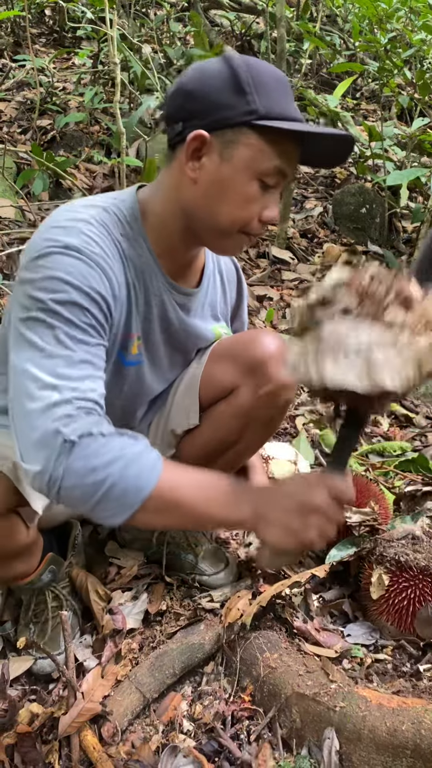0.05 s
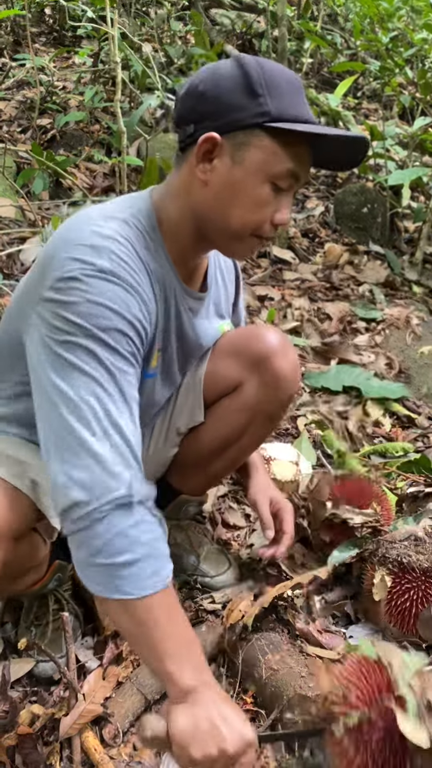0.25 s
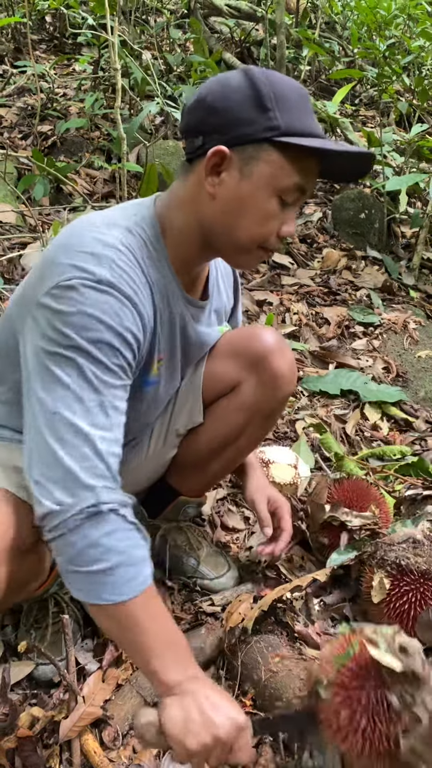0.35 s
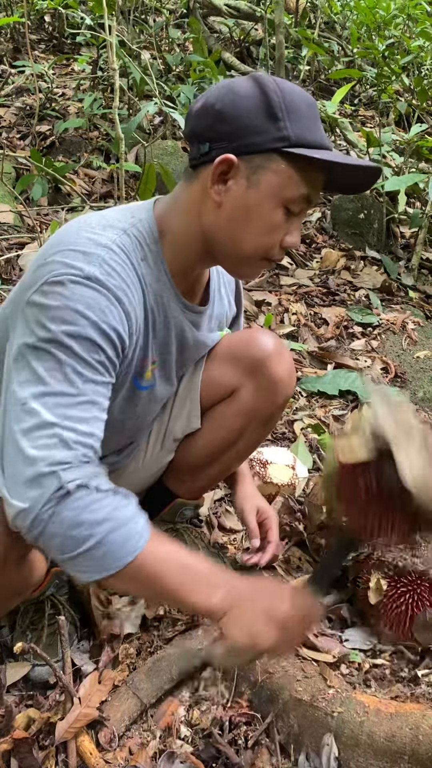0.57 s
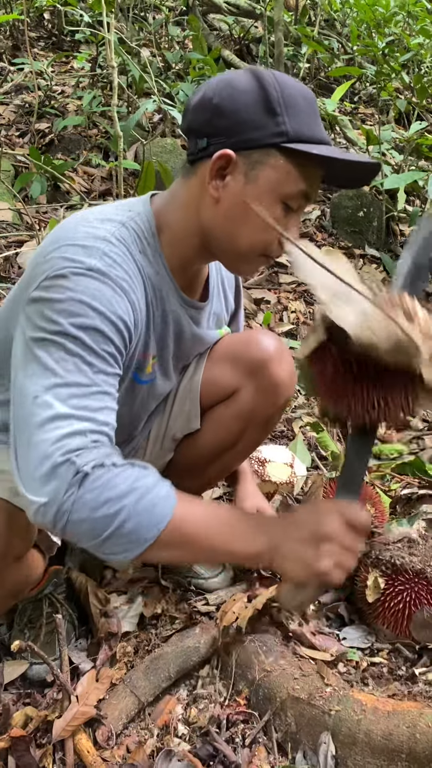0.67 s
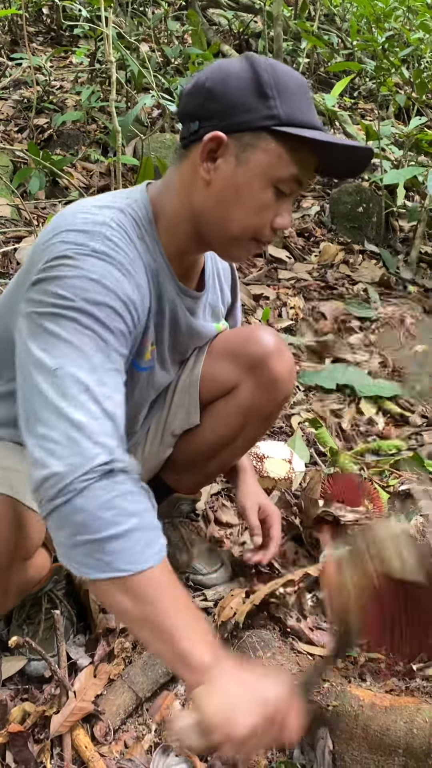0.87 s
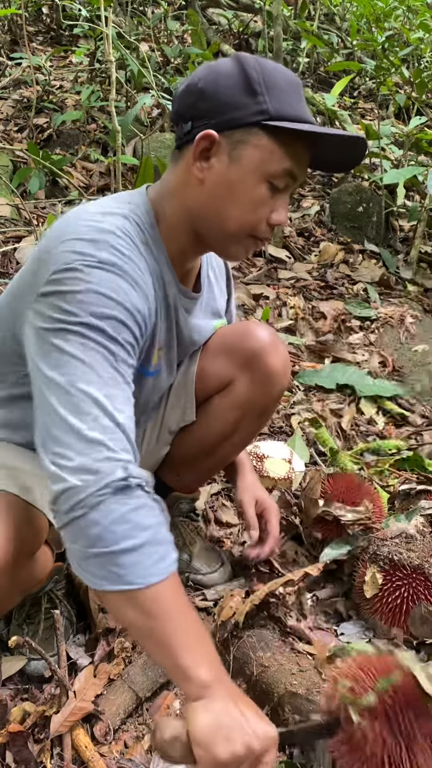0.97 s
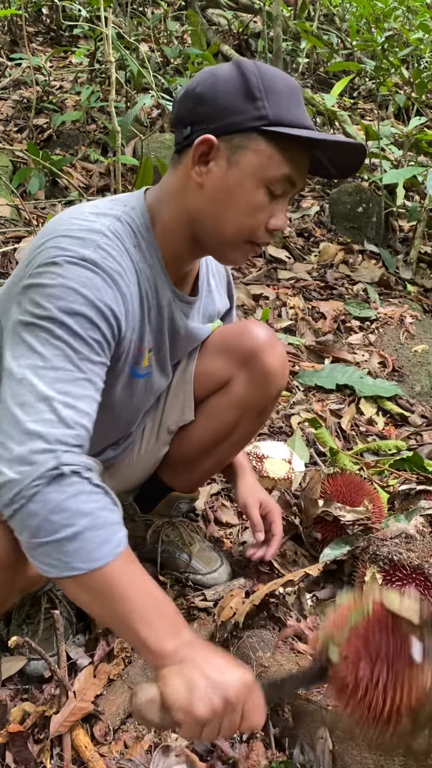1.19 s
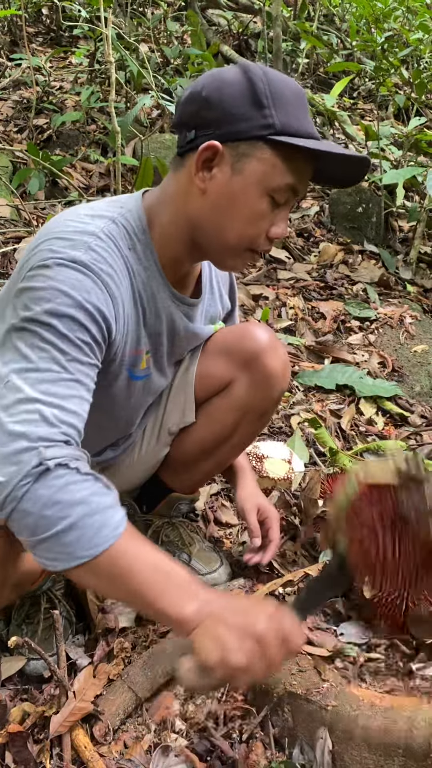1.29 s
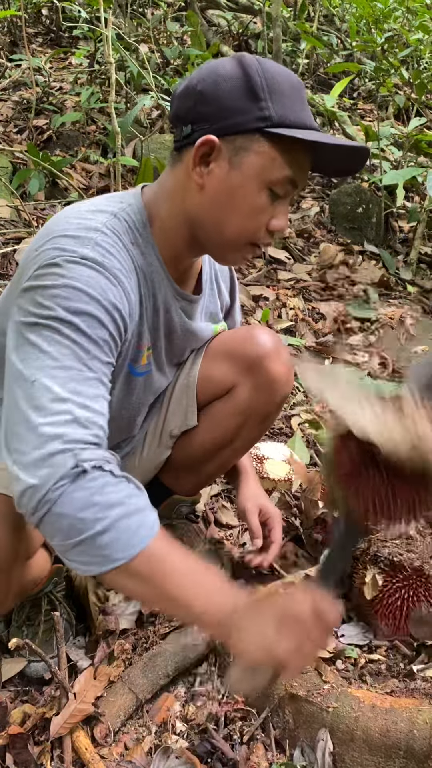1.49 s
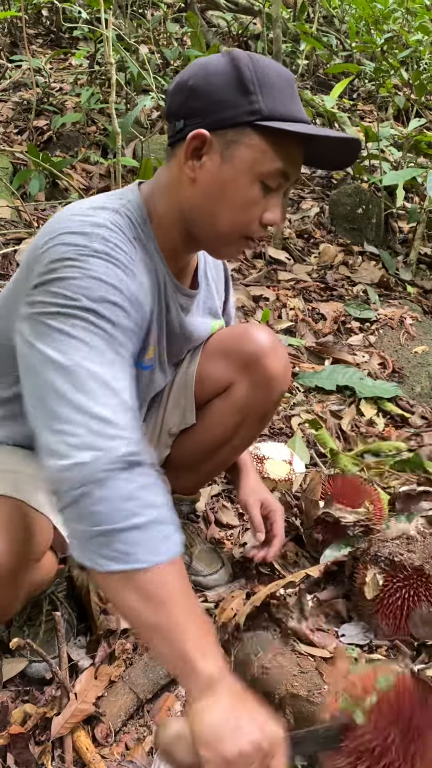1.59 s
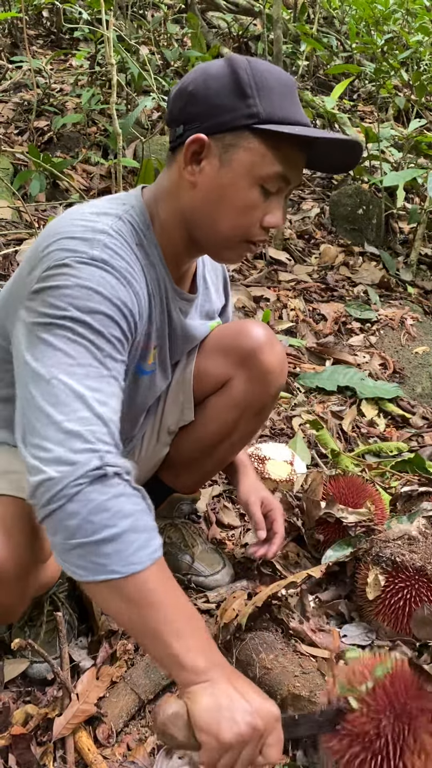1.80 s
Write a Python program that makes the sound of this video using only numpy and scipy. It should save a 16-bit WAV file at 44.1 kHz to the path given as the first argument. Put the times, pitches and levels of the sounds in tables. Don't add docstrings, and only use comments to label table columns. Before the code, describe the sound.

A spiky fruit stuck on a heavy blade is slammed three times onto a root outdoors

```python
import sys
import numpy as np
from scipy import signal
from scipy.fft import rfft, irfft
from scipy.io import wavfile
from scipy.ndimage import uniform_filter1d

SR = 44100
rng = np.random.default_rng(int(sys.argv[2]) if len(sys.argv) > 2 else 0)


def store_wav(level_fs):
    pcm = np.round(np.clip(np.atleast_2d(level_fs), -1, 1) * 32767)
    wavfile.write(sys.argv[1], SR, pcm.T.astype(np.int16))


def ratio(d):
    e = np.asarray(d, float) / 20
    return 10 ** e


N = 81585

# (frequency [Hz], level [dB])
FOREST_SPECTRUM = [(200, -9), (600, -6), (1200, -9), (3000, -6.5), (5000, -9), (7800, -1.5), (9500, -10.5),
                   (13500, -11.5)]
# (time [s], level [dB])
WIND_SWELL = [(0, -8), (.13, -3.5), (0.301, 3), (.55, -2.5), (.7, -6.5), (.84, -8), (1.1, 0), (1.28, -1),
              (1.36, 3), (1.55, -1), (1.85, -2)]
# (centre [Hz], width [Hz], level [dB], throb depth [dB], throb rate [1/s])
INSECT_CHORUSES = [
    (5800, 86, -68, 0, 4.9),
    (4050, 400, -74, 3, 11),
    (13500, 680, -76, 2.5, 14),
]
# (start [s], length [s], pitch [Hz], level [dB])
BIRD_NOTES = [(0.024, 0.052, 4050, -56), (0.668, 0.047, 4070, -55.5), (0.693, 0.066, 3166, -60),
              (0.055, 0.032, 3180, -62), (1.254, 0.074, 4075, -59), (1.302, 0.06, 3100, -62),
              (1.796, 0.042, 5070, -59)]
# (start [s], length [s], wingbeat [Hz], level [dB], second partial [dB])
FLY_PASSES = [
    (0.423, 0.1, 278, -69.5, 2),
    (1.274, 0.097, 291.3, -68.5, -4),
    (1.304, 0.57, 288.5, -76, 6),
]
# (start [s], length [s])
RUSTLE_TIMES = [(.935, .065), (1.002, .03), (1.15, .08), (1.63, .055), (1.71, .045), (1.275, .03), (.3, .2),
                (.245, .1), (1.02, .045)]
# (level [dB], centre [Hz])
RUSTLE_TONES = [(-42.5, 4200), (-46.5, 7000), (-55.5, 3470), (-45.5, 4900), (-57.5, 2600), (-57, 9000),
                (-60.5, 1900), (-51.5, 2800), (-47.5, 3900)]
# (time [s], peak [dB], pitch [Hz], T60 [s])
TWIG_TICKS = [(0.168, -48.5, 5460, 0.049), (0.345, -52, 3200, 0.024), (0.364, -45, 4800, 0.022),
              (0.3778, -37.5, 4470, 0.006), (0.444, -46, 3700, 0.02), (0.688, -49.5, 3880, 0.013),
              (0.714, -55, 2980, 0.039), (0.989, -36.5, 4180, 0.012), (1.008, -43.5, 3150, 0.024),
              (1.163, -53.5, 1650, 0.026), (1.179, -44.5, 1160, 0.018), (1.208, -50, 2110, 0.018),
              (1.642, -34, 5040, 0.016), (1.648, -24.5, 4970, 0.01), (1.6563, -22.5, 4950, 0.021),
              (1.731, -45.5, 5660, 0.027), (1.74, -42.5, 5020, 0.015), (0.966, -38, 6150, .012),
              (.972, -39, 5640, .012), (0.984, -45, 1590, .012), (1.014, -46, 4600, .012),
              (1.022, -45.5, 3340, .012), (1.026, -45, 4300, 0.011), (1.034, -39, 3890, 0.016),
              (1.041, -37, 3950, 0.011), (1.054, -43, 1700, 0.015), (1.059, -37.5, 4450, 0.011),
              (1.181, -46.5, 1600, 0.018), (.688, -51.5, 2250, 0.013), (.716, -55, 2006, 0.017),
              (1.568, -46, 5240, 0.011)]
# (time [s], peak [dB], pitch [Hz], T60 [s],
# breadth [share of pitch])
HUSK_REBOUNDS = [(0.2634, -20, 950, 0.025, 0.4), (.2633, -19, 3680, 0.012, 0.3),
                 (.2636, -23, 1750, .018, .4), (0.2855, -35, 1500, 0.015, 1.2),
                 (0.315, -42, 1200, 0.018, .8), (0.9369, -23, 1855, 0.018, 0.45),
                 (0.9373, -17, 5740, 0.025, 0.82), (.965, -38.5, 530, 0.034, 0.31),
                 (.9375, -30, 900, .03, .7), (1.040, -44, 975, 0.02, 0.35), (1.0545, -33, 1300, 0.03, 2.6),
                 (.962, -33, 4500, .02, 1.2), (1.5758, -13.5, 5900, 0.012, 0.5),
                 (1.577, -36, 11000, 0.028, 0.5), (1.6203, -22, 2200, 0.03, 1.1),
                 (1.6225, -27, 800, .03, .8), (1.7015, -33, 1480, 0.037, 1.8),
                 (1.5865, -7, 4930, 0.014, 0.36), (.9036, -12.5, 3800, 0.027, 0.39),
                 (1.7098, -38, 6000, .006, 1.2), (.8722, -47, 2500, .01, 1.2),
                 (1.287, -55.5, 11000, .02, 0.69), (1.166, -42, 16000, .02, 1.1),
                 (.2255, -15, 5600, .014, .4), (.8945, -36, 2700, .012, .5), (1.5762, -33, 1500, .02, 1.6),
                 (1.0025, -44, 1400, .011, 1.3), (1.0105, -44, 950, .011, .9),
                 (.4452, -51, 1300, .014, 2.1), (.5875, -55, 1300, .011, 1.7)]
# (contact [s], soil delay [s], crack [dB], spine crush before contact [dB], leaf crackle [dB])
BLOW_EVENTS = [
    (0.2251, 0.0071, -12.5, -25, -24.5),
    (0.903, 0.0034, -10, -28, -26),
    (1.5851, 0.00066, -16.5, -28.5, -26.5),
]
# (frequency [Hz], level [dB], T60 [s])
HUSK_MODES = [
    [(178.5, -5.5, 0.06), (274.4, -9.5, 0.069), (322, 3, 0.031), (565, 1.5, 0.018), (649, 3, 0.035),
     (898, 0, 0.03), (1230, 1, 0.025), (1475, -10, .03), (1639, 3.5, 0.014), (2078, 4.5, .018)],
    [(143, -7.5, 0.079), (259.3, 0.5, 0.075), (337.5, -1, 0.044), (507, -4.5, 0.041), (669, -5, 0.036),
     (850, -1.5, 0.047), (1024, -4.5, 0.055), (1320, -5, 0.03), (1412, -0.5, 0.059), (1914, -13, 0.033),
     (2150, 1, 0.02), (2440, 5, 0.027)],
    [(166, -12.5, 0.085), (262.6, -8, 0.087), (346.4, -2, 0.11), (529, 4, 0.053), (738, 1, 0.022),
     (853, 7, 0.014), (1090, 6, 0.01), (1490, -8.5, 0.022), (1910, -15, 0.03), (2380, -11, .02)],
]
# (frequency [Hz], level [dB], T60 [s])
SOIL_MODES = [
    [(60.8, -38, 0.35), (85, -44.5, 0.17)],
    [(47, -35, 0.26), (84, -37, 0.42)],
    [(47.8, -31.5, 0.26), (77.8, -42, 0.4)],
]
# (delay [s], share of first jolt [1])
SEATING_JOLTS = [
    [(.0035, 1.09), (.0072, .7)],
    [(.0028, 0.47), (.0068, 0.374)],
    [(.0012, .9), (.0075, 0.385)],
]
# (frequency [Hz], level [dB])
CRACK_SPECTRUM = [(600, -10.5), (1500, -4), (5000, -12.5), (7000, -9.5), (9000, 0), (11500, -3.5),
                  (13500, -4), (16500, -34.5)]
# (frequency [Hz], level [dB])
LEAF_SPECTRUM = [(150, -7), (400, 10.5), (1500, -12.5), (4000, -1.5), (7000, -5.5), (9000, -28),
                 (12000, -57.5), (16000, -66.5)]
# (frequency [Hz], phase [rad])
PORT_PHASE_RAD = [(150, 0), (500, 1.2), (1000, .4), (2000, .4), (2900, -1.7), (6000, -1.9), (8200, -np.pi),
                  (12300, -np.pi), (16000, -5.4)]
# (frequency [Hz], phase [rad])
LOW_PHASE_RAD = [(500, 0.1), (1000, -6), (2000, 0.34), (2900, -1.64), (6000, -1.24), (9000, -3),
                 (12000, -3), (16000, -5)]
# (frequency [Hz], level [dB])
PORT_LEVEL_DB = [(300, 1), (500, -5), (900, -1.5), (1400, -7.5), (2000, 3.5), (3500, -6), (6000, 1),
                 (16000, 1.5)]
# (frequency [Hz], share [0-1])
FAR_ALIKE = [(100, 0.61), (400, 0.15), (1500, 0.067), (4000, 0.25), (6000, 0.55), (8200, 0.99),
             (16000, 0.99)]

FOREST_DB, FOREST_TOP_HZ, WIND_TOP_HZ = -55, 13900, 1100
BREEZE_HZ, BREEZE_WIDTH_HZ, BREEZE_DB, BREEZE_GUST_DB = 59.9, 98, -81.5, 5
WOODS_T60_S, WOODS_DB = 0.74, -38.5
RUSTLE_GRAINS_PER_S, RUSTLE_SPREAD_DB = 3000, 2.2
CRACKLE_T60_S, CRACKLE_PER_S, CRACKLE_SPREAD_DB = 0.16, 6600, 3
RUMBLE_T60_S, RUMBLE_DB = 0.32, -11
KNOCK_DB, RISE_CYCLES, PUSH_S = -13, 0.53, 0.00022
CRUSH_S, CRUSH_RISE_S = 0.0056, 0.0024
CRACK_RISE_S, CRACK_HOLD_S, CRACK_T60_S, CRACK_PAN_DB = 0.0019, 0.002, 0.023, -2
BURST_RISE_S, SNAP, TICK_BREADTH = 0.00082, 2.1, 0.21
MIC_LOW_HZ, MIC_TOP_HZ = 45, 15900


def decay(t, t60_s):
    fall = np.exp(-np.log(1000) * np.clip(t, 0, None) / max(t60_s, .002))
    return (t >= 0) * fall


def swell(t, start_s, length_s):
    return np.sin(np.pi * np.clip((t - start_s) / length_s, 0, 1))


def unit(x):
    return x / np.sqrt(np.mean(x ** 2))


def noise():
    return rng.standard_normal(N)


def walk(rate_hz):
    k = int(SR / rate_hz)
    steps = np.repeat(rng.standard_normal(N // k + 1), k)
    return unit(uniform_filter1d(uniform_filter1d(steps, k), k)[:N])


def grains(per_s, spread_db):
    hits = rng.random(N) < per_s / SR
    return unit(hits * rng.standard_normal(N) * ratio(spread_db * rng.exponential(size=N)))


def colour(x, spectrum):
    hz, db = np.array(spectrum).T
    log_gain = np.interp(np.log(np.arange(513) * SR / 1024 + 1), np.log(hz), db) * np.log(10) / 20
    cepstrum = irfft(log_gain)
    cepstrum[1:512] *= 2
    cepstrum[513:] = 0
    response = unit(irfft(np.exp(rfft(cepstrum)))) / 32
    return signal.fftconvolve(x, response)[:len(x)]


def band(x, hz, width_hz):
    q = max(hz / width_hz, .2, hz / (.3 * SR))
    return signal.lfilter(*signal.iirpeak(min(hz, .45 * SR), q, fs=SR), x)


def steep_band(x, hz, width_hz):
    return band(band(x, hz, width_hz), hz, width_hz)


def outline(table):
    hz, value = np.array(table).T
    return np.interp(np.log(np.arange(N // 2 + 1) * SR / N + 1), np.log(hz), value)


def ports(x, pan_db=0, phase=PORT_PHASE_RAD):
    half = ratio(outline(PORT_LEVEL_DB) / 2) * np.exp(-.5j * outline(phase))
    gains = np.array([half * ratio(pan_db / 2), ratio(-pan_db / 2) / half])
    return irfft(rfft(x) * gains, N)


def breeze():
    rumble = unit(steep_band(noise(), BREEZE_HZ, BREEZE_WIDTH_HZ))
    return rumble * ratio(BREEZE_DB + BREEZE_GUST_DB * walk(21.0))


def insects():
    return sum(unit(steep_band(noise(), hz, width_hz)) * ratio(db + throb_db * walk(rate_hz))
               for hz, width_hz, db, throb_db, rate_hz in INSECT_CHORUSES)


def forest():
    leaves = unit(colour(noise(), FOREST_SPECTRUM))
    wind_db = np.interp(np.arange(N) / SR, *np.array(WIND_SWELL).T)
    air = 0
    for hz in 200 * 2. ** np.arange(7):
        flicker_db = 0.89 * walk(11) + wind_db / (1 + (hz / WIND_TOP_HZ) ** 2)
        air = air + band(leaves, hz, hz) * ratio(flicker_db)
    air = unit(air) * ratio(FOREST_DB + 1.1 * walk(1.3)) + insects()
    return signal.sosfilt(signal.ellip(6, .5, 40, FOREST_TOP_HZ, fs=SR, output="sos"), air)


def birds(t):
    return sum(ratio(db) * swell(t, start_s, length_s) * unit(steep_band(noise(), hz, 53))
               for start_s, length_s, hz, db in BIRD_NOTES)


def fly(t):
    drift_s = np.cumsum(1 + 0.011 * walk(24.38)) / SR
    out = 0
    for start_s, length_s, hz, db, second_db in FLY_PASSES:
        phase = 2 * np.pi * hz * drift_s
        wings = np.sin(phase) + ratio(second_db) * np.sin(2 * phase)
        out = out + ratio(db + 7.9 * walk(30.16)) * swell(t, start_s, length_s) * wings
    return out


def scatter(near):
    u = np.arange(SR // 2) / SR
    trunks = rng.standard_normal((2, SR // 2)) * decay(u - .004, WOODS_T60_S)
    trunks = trunks / np.sqrt((trunks ** 2).sum() / 2)
    return ratio(WOODS_DB) * signal.fftconvolve(near[None], trunks)[:, :N]


def surroundings(near):
    alike = np.clip(outline(FAR_ALIKE), 0, 1)
    shared = rfft(ports(forest()))
    separate = rfft(np.array([forest(), forest()]) + scatter(near))
    return irfft(shared * np.sqrt(alike) + separate * np.sqrt(1 - alike), N)


def rustles(t, first):
    fine = grains(RUSTLE_GRAINS_PER_S, RUSTLE_SPREAD_DB)
    return sum(ratio(db) * np.sqrt(swell(t, *span)) * unit(band(band(fine, hz, hz * 2.8), hz, hz * 2.0))
               for span, (db, hz) in zip(RUSTLE_TIMES[first::2], RUSTLE_TONES[first::2]))


def burst(t, start_s, peak_db, hz, t60_s, breadth):
    i = int(start_s * SR)
    u = t[i:i + 4096] - start_s
    rattle = rng.standard_normal(4096)[:len(u)]
    if breadth < 1 / 3:
        rattle = rattle + 0.68 * np.sin(2 * np.pi * hz * u)
    y = rattle * decay(u, t60_s) * np.clip(u / BURST_RISE_S, 0, 1)
    y[16] += SNAP * np.sqrt(SR / (hz * breadth * 20))
    y = steep_band(y, hz, 1.6 * hz * breadth)
    return np.pad(y * ratio(peak_db) / np.abs(y).max(), (i, N - i - len(u)))


def ticks(t):
    return sum(burst(t, *row, TICK_BREADTH) for row in TWIG_TICKS)


def rebounds(t):
    return sum(burst(t, *row) for row in HUSK_REBOUNDS)


def ring(u, modes):
    out = 0
    for hz, db, t60_s in modes:
        rise = 1 - np.exp(-(u * hz / RISE_CYCLES) ** 2)
        out = out + ratio(db) * decay(u, t60_s) * rise * np.sin(2 * np.pi * hz * u)
    return out


def husk_knock(u, modes, later_jolts):
    v = np.arange(2048) / SR
    push = np.exp(-(v / PUSH_S - 1) ** 2)
    for delay_s, share in later_jolts:
        push = push + share * np.exp(-((v - delay_s) / PUSH_S) ** 2)
    return ratio(KNOCK_DB) * signal.fftconvolve(ring(u, modes), push / (PUSH_S * SR * 2.25))[:N]


def spine_cracks(t):
    envelope = 0
    for contact_s, _, crack_db, crush_db, _ in BLOW_EVENTS:
        u = t - contact_s
        crush = (u < 0) * np.clip((u + CRUSH_S) / CRUSH_RISE_S + 1, 0, 1)
        crack = np.clip(u / CRACK_RISE_S, 0, 1) * decay(np.maximum(u - CRACK_HOLD_S, 0), CRACK_T60_S)
        envelope = envelope + ratio(crack_db) * crack + ratio(crush_db) * crush
    return colour(noise(), CRACK_SPECTRUM) * envelope


def blows(t):
    crackle = colour(grains(CRACKLE_PER_S, CRACKLE_SPREAD_DB), LEAF_SPECTRUM)
    rumble = ratio(RUMBLE_DB) * unit(band(noise(), 210, 150))
    out = 0
    for event, husk, soil, later_jolts in zip(BLOW_EVENTS, HUSK_MODES, SOIL_MODES, SEATING_JOLTS):
        contact_s, soil_delay_s, _, _, leaf_db = event
        u = t - contact_s
        settling = crackle * decay(u, CRACKLE_T60_S) + rumble * decay(u - .01, RUMBLE_T60_S)
        out = out + husk_knock(u, husk, later_jolts) + ring(u - soil_delay_s, soil) + ratio(leaf_db) * settling
    return out


def scene():
    t = np.arange(N) / SR
    cracks = spine_cracks(t)
    near = blows(t) + rebounds(t) + rustles(t, 0)
    out = surroundings(near + cracks) + breeze()
    out = out + ports(near + fly(t) + birds(t))
    out = out + ports(rustles(t, 1), -6.5, LOW_PHASE_RAD)
    out = out + ports(ticks(t), -0.79, LOW_PHASE_RAD)
    return out + ports(cracks, CRACK_PAN_DB, LOW_PHASE_RAD)


def band_limit(x):
    return signal.sosfilt(signal.butter(12, 16970, fs=SR, output="sos"), x)


def record(dry):
    mix = signal.sosfilt(signal.ellip(4, .5, 22, MIC_TOP_HZ, fs=SR, output="sos"), dry)
    mix = signal.sosfilt(signal.butter(2, MIC_LOW_HZ, "high", fs=SR, output="sos"), mix)
    return band_limit(mix)


dry = scene()
out = record(dry)
store_wav(out)
```